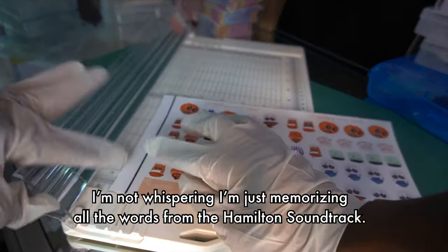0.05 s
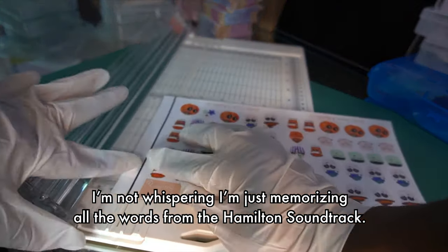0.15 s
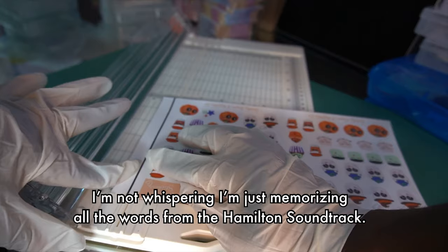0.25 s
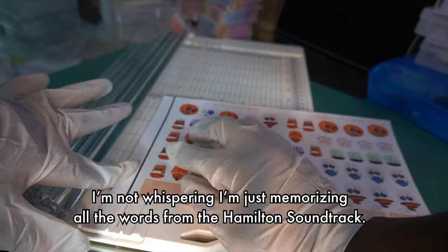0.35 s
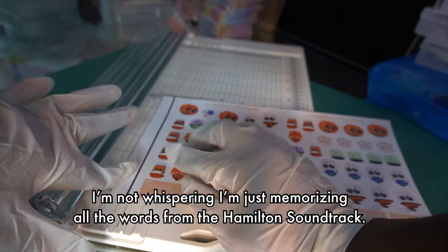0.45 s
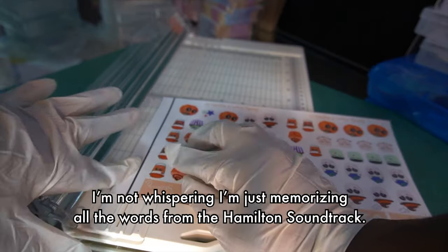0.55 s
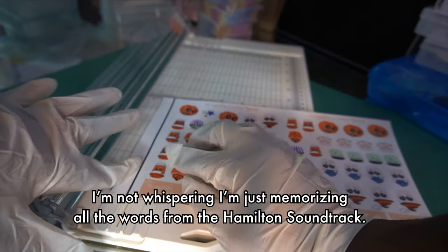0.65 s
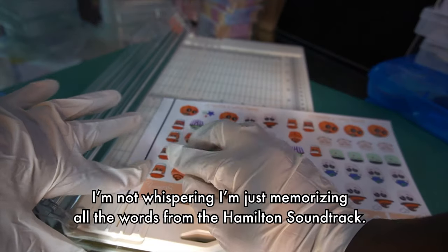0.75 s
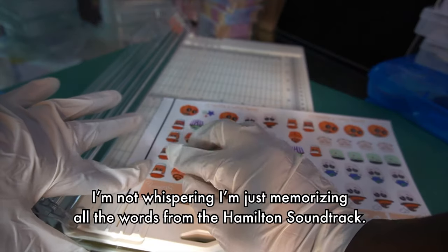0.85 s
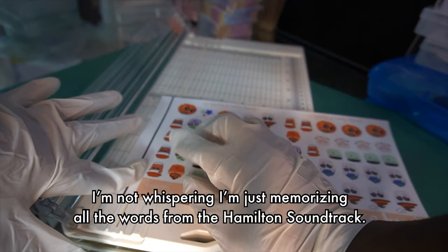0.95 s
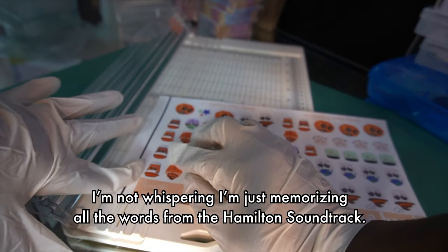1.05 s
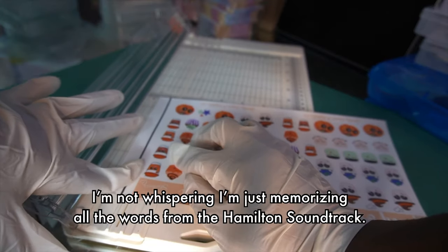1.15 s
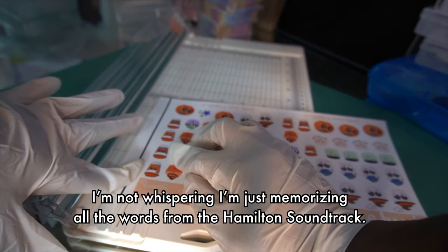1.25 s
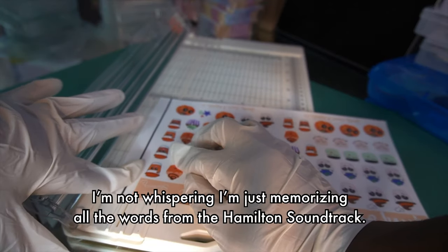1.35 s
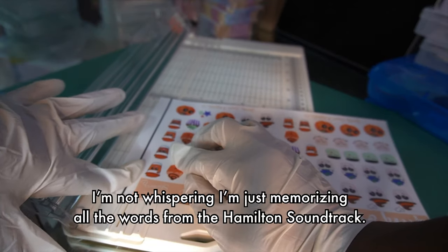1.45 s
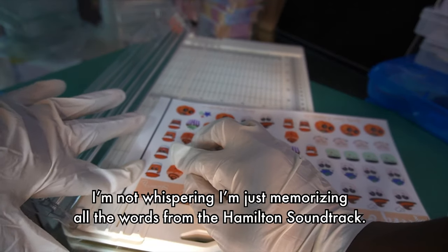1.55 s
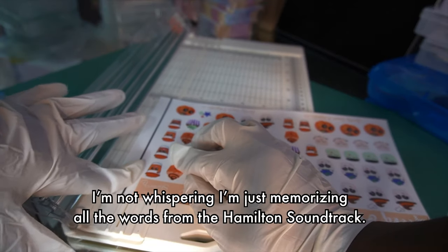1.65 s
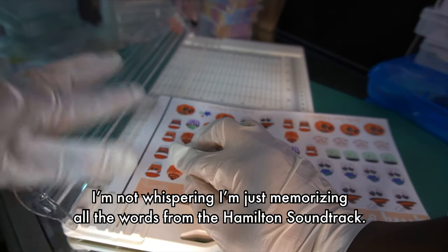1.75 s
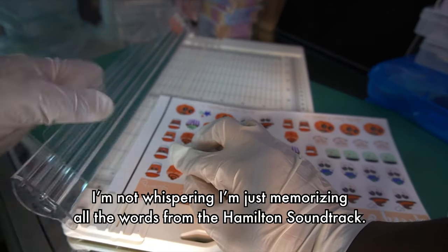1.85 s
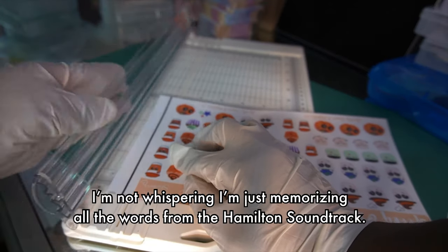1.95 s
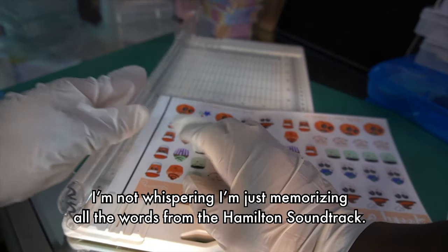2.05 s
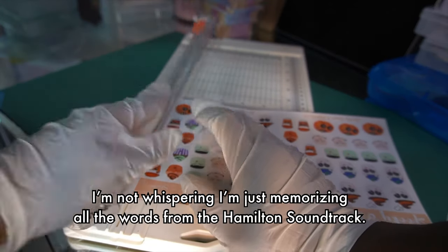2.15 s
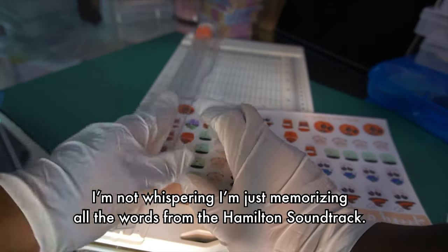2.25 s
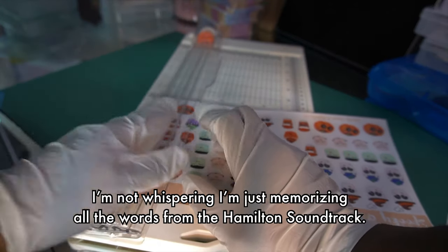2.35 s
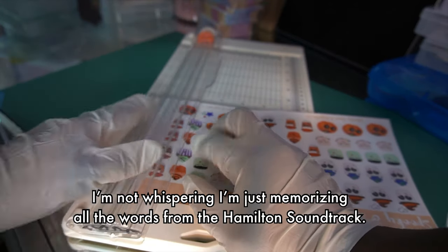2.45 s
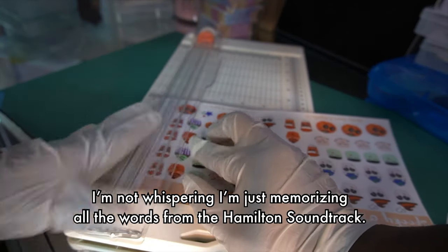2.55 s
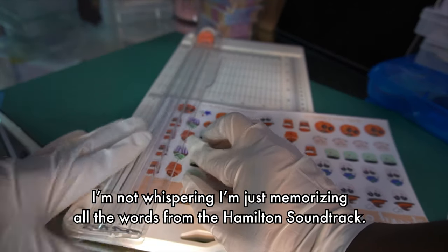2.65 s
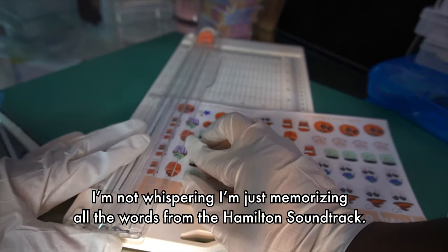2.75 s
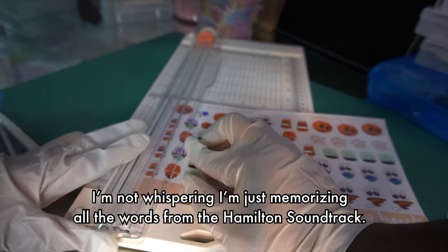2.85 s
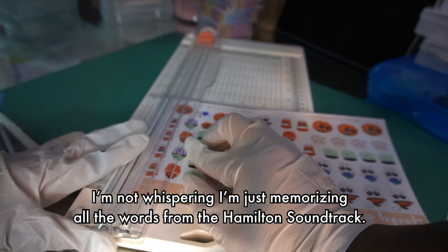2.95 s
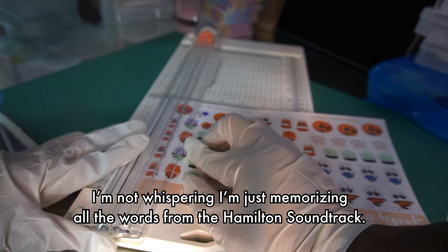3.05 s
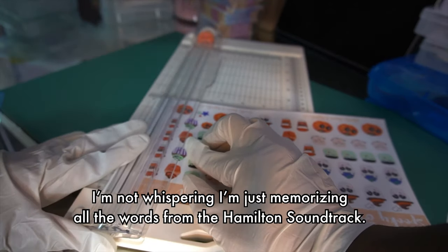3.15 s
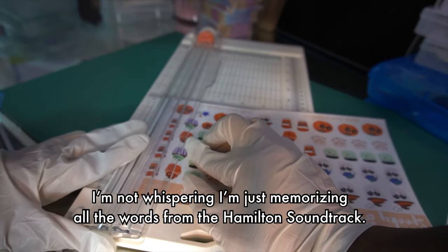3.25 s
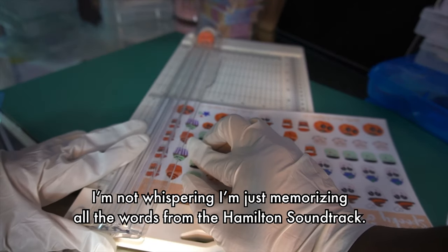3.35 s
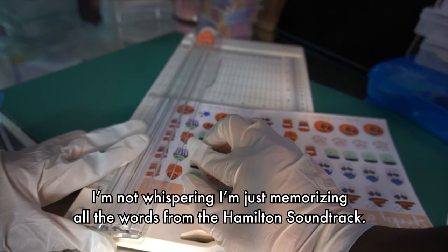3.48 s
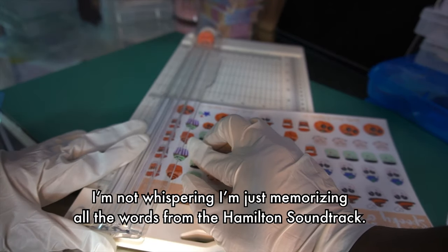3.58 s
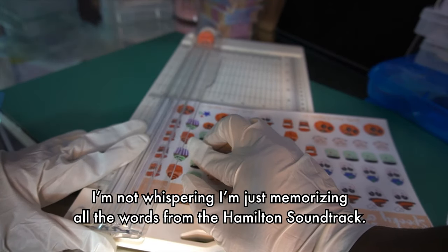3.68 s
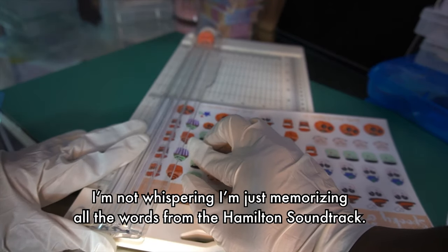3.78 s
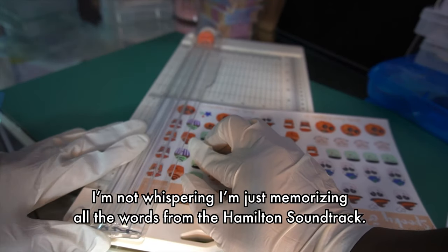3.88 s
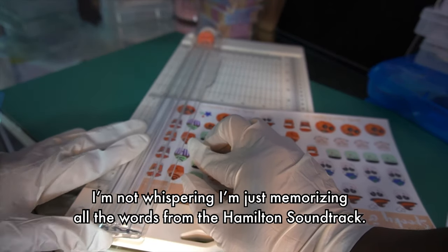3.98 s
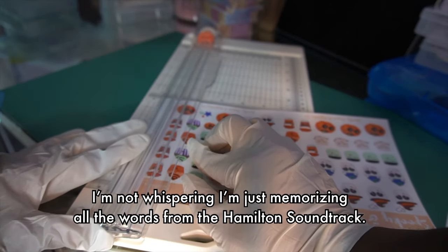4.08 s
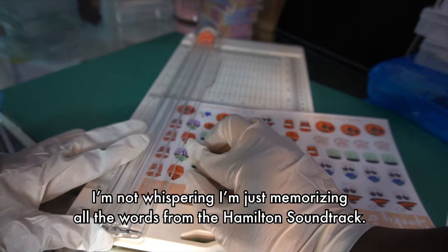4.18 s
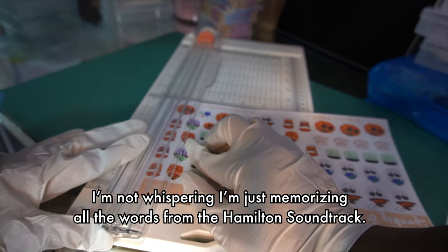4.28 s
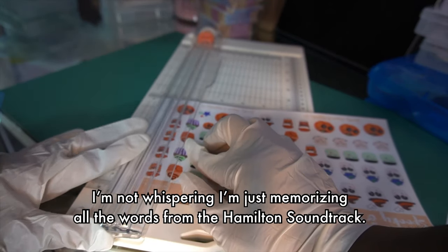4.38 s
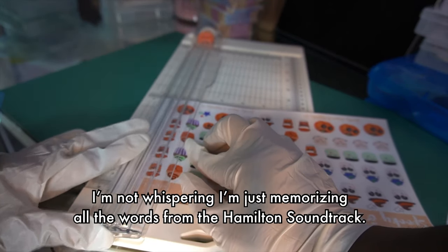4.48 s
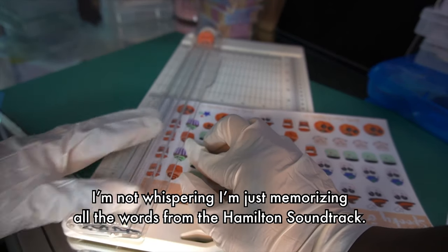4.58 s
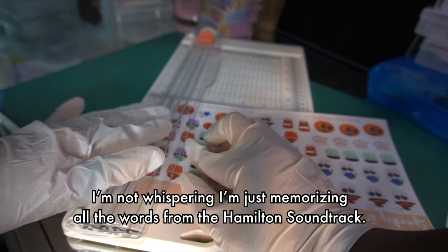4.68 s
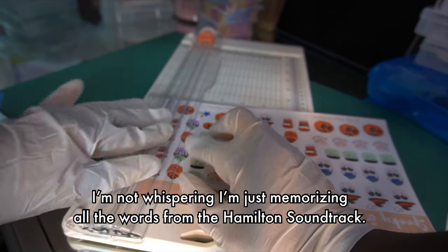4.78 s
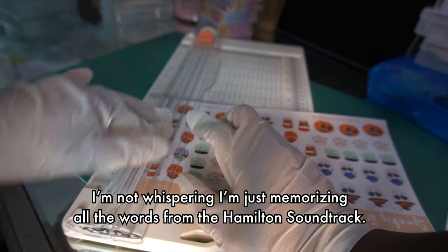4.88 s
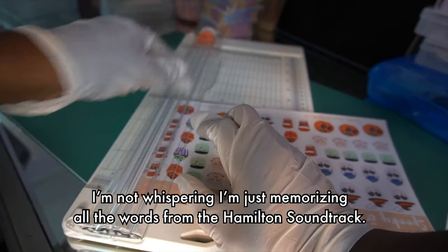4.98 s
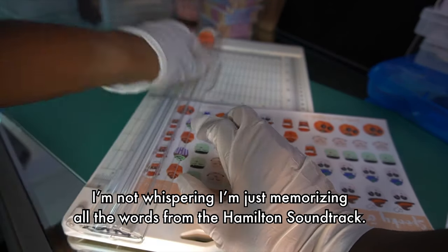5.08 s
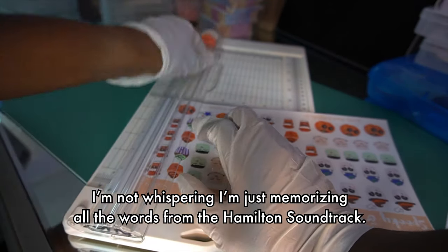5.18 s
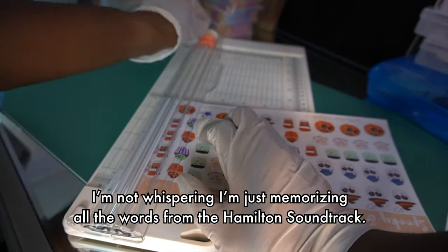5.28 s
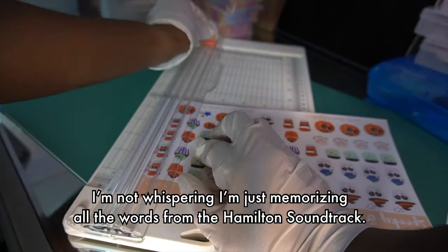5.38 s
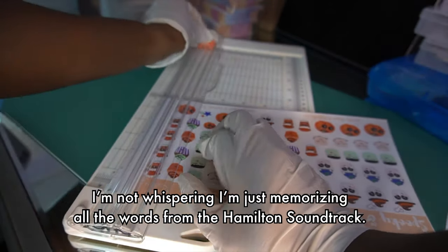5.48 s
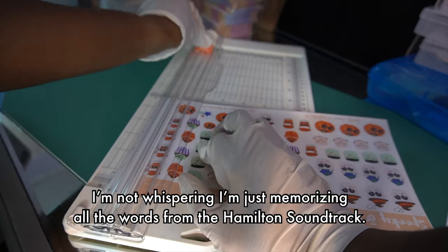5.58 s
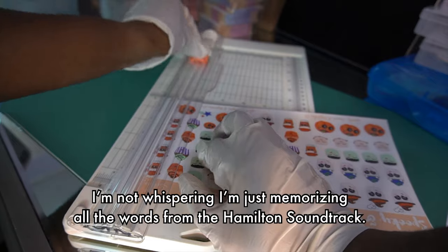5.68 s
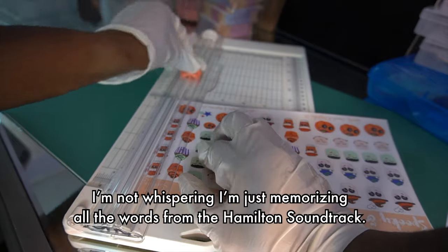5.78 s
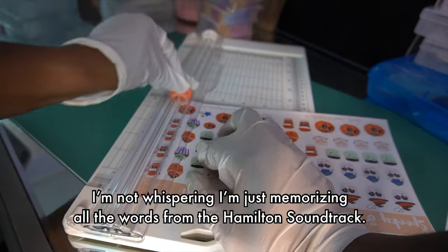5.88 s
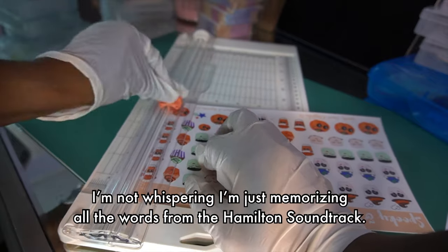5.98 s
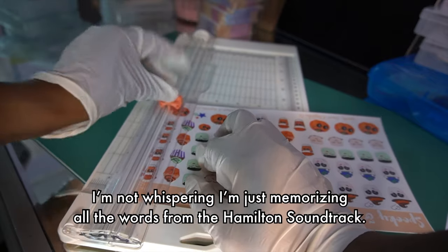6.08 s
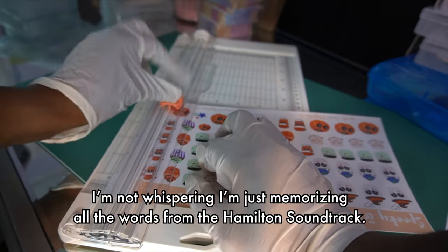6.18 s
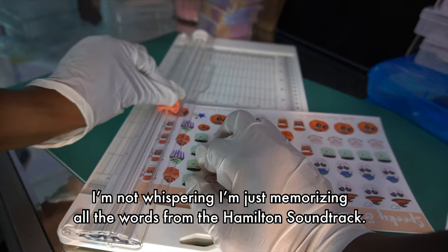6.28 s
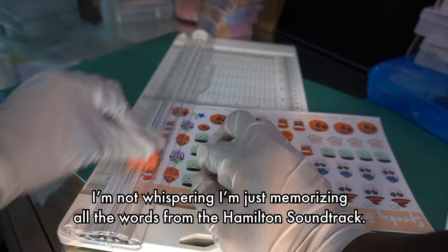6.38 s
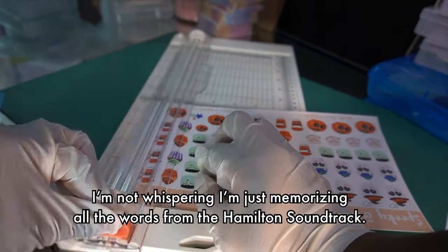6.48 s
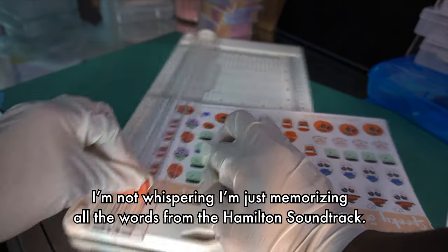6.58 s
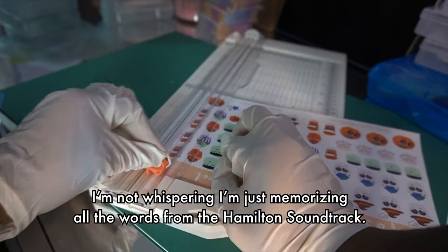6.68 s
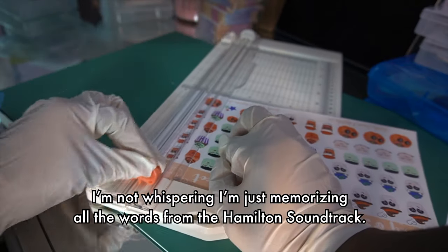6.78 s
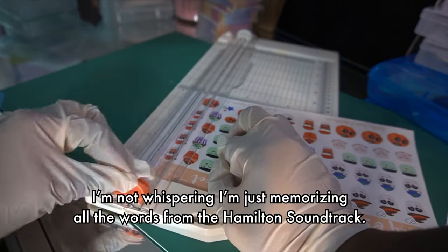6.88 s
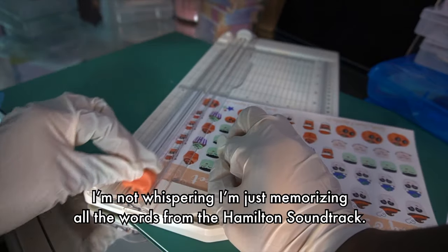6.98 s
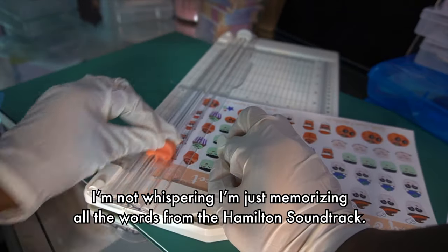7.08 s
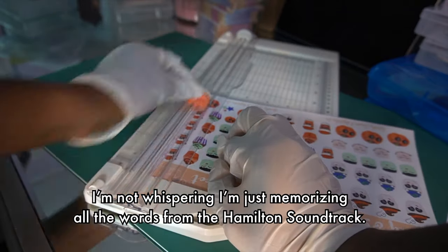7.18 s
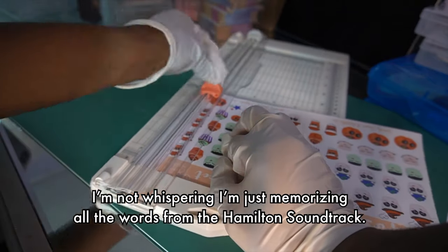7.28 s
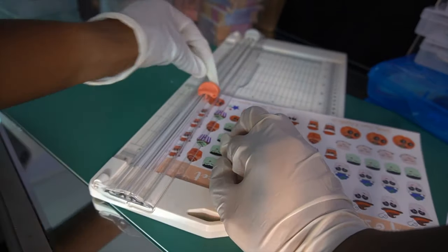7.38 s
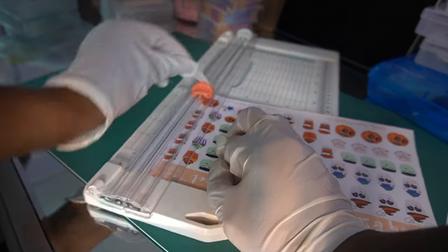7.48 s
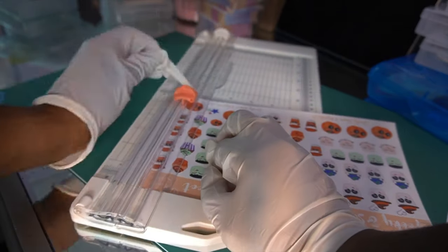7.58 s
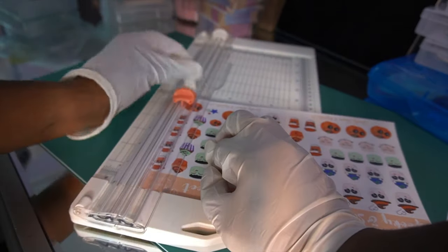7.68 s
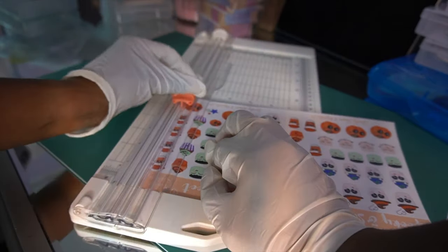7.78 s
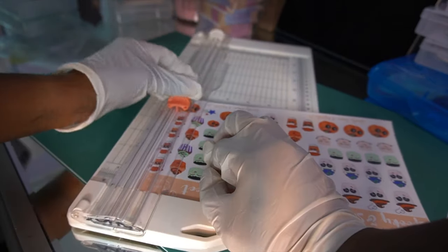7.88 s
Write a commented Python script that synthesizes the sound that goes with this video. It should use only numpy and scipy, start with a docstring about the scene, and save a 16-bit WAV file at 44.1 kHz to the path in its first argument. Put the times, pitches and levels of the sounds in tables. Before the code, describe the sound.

Gloved hands line up a sheet on a plastic paper trimmer with faint rustles and ticks. The guide rail clatters shut, and the soft handling goes on. Then the blade carriage is nudged along with clicks and little scrapes, drawn through the paper in two quick pulls, and knocks on its stop. It slides back and knocks again. Each blow rings the hollow base and thumps the desk, close up in a quiet room.

```python
"""A plastic paper trimmer on a desk, close up in a quiet room. A sheet slides to rest; gloved hands line it
up with rustles and ticks. At 2.3 s the guide rail clatters shut. From 5 s the blade carriage is nudged
along, scraping in fine slips; one small squeak at 5.9 s. At 6.2 s two pulls draw the carriage through
the paper; at 6.7 s it bounces on its stop. It is pushed back and hits a stop again at 7.3 s.
Every blow rings the hollow base and thumps the desk."""
import sys
import numpy as np
from scipy import signal
from scipy.fft import rfft, irfft, next_fast_len
from scipy.io import wavfile
from scipy.ndimage import uniform_filter1d, map_coordinates

SR = 44100
rng = np.random.default_rng(int(sys.argv[2]) if len(sys.argv) > 2 else 0)


def bounce(signal):
    """Save signal as a 16-bit WAV file at the path given by the first command-line argument."""
    frames = np.transpose(np.atleast_2d(signal))
    limited = np.clip(frames, -1, 1)
    pcm = np.round(limited * 32767).astype(np.int16)
    wavfile.write(sys.argv[1], SR, pcm)


N = 349707

# hard clacks of plastic on plastic, and clicks of the blade: t/s, knock/dB, snap/dB, thump/dB, knock centre/Hz,
# snap edge/dB
HARD_CLACKS = [(4.99, -52, -36.5, -54, 1390, -2.5), (5.112, -28.5, -24.5, -54, 1130, 6),
               (5.1159, -16, -25, -31, 1860, 10), (5.1193, -47, -21, -61, 2080, 3),
               (5.364, -15, -35, -52, 1360, 1), (5.371, -22.5, -20, -32, 1470, 8.5),
               (5.4814, -34, -28.5, -58, 1750, 2), (5.488, -22.5, -25.5, -56, 1350, 2.5),
               (5.931, -41, -28, -34.5, 1430, 5), (6.208, -36, -33.5, -46, 1260, -2),
               (6.4759, -20.5, -19, -41, 1660, 7), (6.4957, -16, -19.5, -42, 1930, 1),
               (6.866, -25, -17.5, -36, 2110, 4.5), (7.184, -34.5, -35.5, -43, 1390, -3),
               (7.22, -38, -29, -28.5, 1480, -6), (7.322, -32, -34, -35, 1020, 22),
               (7.337, -24.5, -23, -25, 1400, 2), (7.354, -23.5, -41, -50, 1290, -3),
               (7.865, -43, -45, -50, 1390, -12)]
# gloved finger taps: t/s, knock/dB, thump/dB, knock centre/Hz
FINGER_TAPS = [(1.91, -43, -56, 740), (1.941, -37, -58, 973), (2.061, -43.5, -54, 1970),
               (2.496, -53, -45, 730), (2.763, -39, -57, 1900), (4.675, -39.5, -37, 1030),
               (4.79, -35.5, -39, 710), (4.817, -36, -47, 930), (4.972, -42.5, -49, 1000),
               (5.255, -33.5, -49, 1150), (5.4379, -32, -39, 1110), (5.455, -29.5, -43, 1090),
               (5.5753, -24, -40, 1170), (5.675, -37.5, -54, 1710), (5.786, -42, -48, 990),
               (6.149, -35.5, -53, 1640), (6.583, -22.5, -37, 1010), (6.796, -38.5, -61, 1450),
               (6.969, -42, -52, 1750), (7.003, -41.5, -52, 1060), (7.074, -39, -47.5, 1160),
               (7.691, -45, -42.5, 780), (7.752, -38.5, -44, 1550)]
# carriage on an end stop: t/s, knock/dB, thump/dB, bounce gap/s, loss per bounce/dB
STOP_HITS = [(6.682, -14, -25, 0.0062, 6.5), (7.263, -12.5, -23.5, 0.0083, 5.5)]
# brief sliding rubs; a sheet sliding to rest at the start, later the carriage nudges:
# full speed t/s, rise/s, hold/s, fade/(dB/s), rail/dB, then base, hiss, desk/dB re rail
SHORT_SLIDES = [(0.0, 0.005, 0.0026, 407, -39, -8, -4.5, -14),
                (2.24, 0.007, 0.008, 280, -54.5, 0.5, -12, -14),
                (2.326, 0.0093, 0.047, 366, -27.5, 2.5, -1, -4.5),
                (5.132, 0.022, 0.021, 184, -34, -2, -1, -3.5),
                (5.372, 0.008, 0.003, 285, -37.5, 4.5, -3, 4.5),
                (5.495, 0.02, 0.002, 394, -35, 2.5, -4, 0.5), (5.934, 0.011, 0.02, 309, -37, 5.5, 0.5, 1.5),
                (6.68, 0.015, 0.003, 390, -35, -4, -11, 2), (6.841, 0.022, 0.004, 400, -45, 0, 2.5, 2),
                (6.88, 0.0067, 0.006, 208, -44.5, -4.5, 1, 1.5),
                (7.219, 0.075, 0.055, 298.5, -39.5, 3.5, 2, 3),
                (7.331, 0.011, 0.0052, 309, -35, 4.5, -1.5, 3), (7.541, 0.067, 0.07, 385, -44.5, 6, -8, 3),
                (7.925, 0.08, 0.01, 280, -51, 8, -1.5, 8)]
# the cut, one list per pull: t/s, rail/dB, then base, hiss/dB re rail
CUT_PULLS = [
    [(6.235, -57, 11.5, -8), (6.281, -51.5, -3, 1.5), (6.319, -33, -3, 1), (6.393, -33, -0.5, 5.5),
     (6.431, -25, -9, -0.5), (6.468, -30.5, -8, -0.5)],
    [(6.512, -35, 1, -17), (6.548, -47.5, 2, -5), (6.596, -39.5, 4, -6), (6.642, -20.5, -9, -6.5),
     (6.675, -29.5, 3, -4)],
]
# top of the hiss, keenest on the bare far end of the rail: t/s, level/dB
HISS_TOP = [(2.4, 1.5), (5.1, 3), (6.0, 0.5), (6.35, 0.5), (6.7, -0.5), (7.3, 1.5)]
# gloves shifting on paper: t/s, hold/s, level/dB
HAND_MOVES = [(0.096, 0.13, -60), (0.306, 0.097, -63.5), (0.533, 0.02, -65), (0.708, 0.01, -57.5),
              (0.934, 0.076, -60), (1.75, 0.34, -60.5), (2.178, 0.037, -56), (2.457, 0.015, -51.5),
              (2.532, 0.15, -57), (2.794, 0.015, -55), (3.848, 0.02, -58.5), (4.507, 0.16, -59.5),
              (4.794, 0.012, -54.5), (4.962, 0.1, -55), (5.342, 0.022, -52.5), (5.59, 0.4, -55.5),
              (6.094, 0.044, -48), (6.205, 0.04, -52.5), (7.067, 0.083, -48), (7.455, 0.021, -51),
              (7.677, 0.005, -51.5), (7.73, 0.058, -52.5)]
# pitched ticks from handling the sheet, one small squeak at 5.9 s: t/s, f/Hz, level/dB
GLOVE_TICKS = [(0.121, 5760, -50), (0.229, 4230, -51), (0.379, 5740, -52), (0.519, 4350, -55),
               (0.704, 4470, -52), (1.018, 6020, -50.5), (1.784, 7100, -56), (2.033, 6400, -50),
               (2.06, 3940, -44.5), (2.542, 1790, -51), (2.639, 1860, -49), (2.726, 1570, -48),
               (3.857, 5740, -50), (4.212, 2400, -51.5), (4.565, 5970, -52), (4.953, 5930, -52),
               (5.911, 3730, -43.5), (6.108, 5500, -43), (7.863, 6020, -45)]

# resonances: f/Hz, width/Hz, level/dB
BASE_MODES = [(366, 47, 1.5), (464, 26, -0.5), (582, 52, -6), (754, 170, -2.5), (896, 52, 3),
              (1074, 34, 1.5), (1287, 19.4, 0.5), (1615, 152, 3), (1913, 28, 0.5), (2454, 17, -11),
              (2850, 21, -3), (3450, 74, -8.5)]
CARRIAGE_MODES = [(4680, 1900, 6.5), (6970, 1000, -1), (8580, 590, 1.5), (12200, 1160, -2)]
RAIL_MODES = [(1830, 150, -5)]
DRONE_MODES = [(90, 3.1, 2), (139, 17, -10), (184.5, 22, -11.5), (249, 15.3, -13)]
# desk resonances: f/Hz, level/dB, t60/s
DESK_MODES = [(113.8, -8.5, 0.17), (187.2, 2.5, 0.15), (230.4, 0, 0.28)]

# spectra of blows, scrape, gloves and room noise: f/Hz, level/dB
KNOCK_EQ = [(150, -25.5), (400, 8.5), (900, -1), (1700, -5), (3200, 3), (4500, 2), (9000, -14),
            (16000, -41)]
SNAP_EQ = [(1200, -21), (3000, -10), (5000, -1), (7000, 2), (9000, -6), (12000, -7.5), (16000, -11.5)]
RAIL_EQ = [(700, -38.5), (1250, -6), (1700, 0), (2300, 1), (3400, 0), (4500, -9), (7000, -40.5)]
BASE_EQ = [(300, -50.5), (500, 5), (750, 5.5), (1000, 4.5), (1250, 5.5), (1800, -10.5), (4000, -60.5)]
HISS_EQ = [(2000, -30), (3800, -4), (5500, 6.5), (7800, 5.5), (10500, 2), (13500, -0.5), (16000, -2)]
RUMBLE_EQ = [(70, -24.5), (140, -12.5), (190, -7.5), (240, 2), (300, -18), (390, -1.5), (520, -20.5),
             (800, -23), (2000, -57)]
BRUSH_EQ = [(300, 11), (1000, 8), (2500, 2.5), (5500, -2), (8000, -11), (12000, -2.5), (16000, -5.5)]
CRINKLE_EQ = [(2500, -20), (4500, -0.5), (6500, 0), (9000, -4), (13000, -12.5), (16000, -33)]
AIR_EQ = [(15, -43), (25, -27), (59, -16), (74, -30), (94, 5.5), (120, -17), (157, -1), (205, -10),
          (241, -4), (307, -13.5), (437, -11), (955, -18), (1120, -17.5), (1510, -23), (15800, -32)]
# stereo side gain of trimmer and room noise: f/Hz, level/dB
TRIMMER_SIDE = [(100, -74), (400, -83), (800, -41), (1300, -17), (2400, -8.5), (4400, -6), (8000, -4),
                (15000, -5)]
AIR_SIDE = [(60, -29.5), (300, -6.5), (1200, 3.5), (4000, 2), (12000, -1)]
# room decay: f/Hz, t60/s
ROOM_T60 = [(200, 0.47), (1500, 0.24), (6000, 0.12), (15000, 0.026)]

SHUT_S, CHATTER_GAP_S, CHATTER_HOLD_S, SETTLE_DB_PER_S = 2.3194, 0.0178, 0.053, 370
RUN_UP_DB, COAST_DB_PER_S = 19, 300
HAND_RISE_S, HAND_FADE_DB_PER_S = 0.044, 126
TOP_HZ = 16000


def contacts(knock_t60_s=0.015, snap_t60_s=0.017, knock_tail_db=-31, snap_tail_db=-27):
    """Plastic chatters briefly at each contact: base knock, bright snap, desk thump."""
    out, t = np.zeros((2, N)), np.arange(SR // 5) / SR
    tail = amp(-60 * t / .13)

    def burst(t60_s, tail_db):
        return rng.standard_normal((2, len(t))) * (amp(-60 * t / t60_s) + amp(tail_db) * tail)

    def equal_energy(x):
        return x / np.linalg.norm(x, axis=1, keepdims=True) * np.sqrt(.003 * SR)

    blows = rail_chatter() + stop_bounces() + HARD_CLACKS + finger_taps()
    for s, knock_db, snap_db, thump_db, centre_hz, edge_db in blows:
        # the glove cushions light touches: slower onset
        rise_s = np.interp(max(knock_db, snap_db), [-45, -30], [.013, .00012])
        onset = 1 - np.exp(-t / rise_s)
        knock = colour(onset * burst(knock_t60_s, knock_tail_db), knock_spectrum(centre_hz))
        knock = equal_energy(ringing(knock, base_at_contact(), direct=0.18))
        snap = colour(onset * burst(snap_t60_s, snap_tail_db), snap_spectrum(edge_db))
        snap = equal_energy(ringing(snap, CARRIAGE_MODES, direct=2.1))
        add(out, s, amp(knock_db) * knock + amp(snap_db) * snap + amp(thump_db) * desk_thump(t))
    return out


def rail_chatter(count=7, knock_db=-20, snap_db=-23, thump_db=-31, thump_slope_db_per_s=300,
                 centre_hz=1400, edge_db=3):
    """The rail chatters on the base; its weight reaches the desk as it starts to settle."""
    offsets_s = CHATTER_GAP_S * np.arange(count) - CHATTER_HOLD_S
    losses_db = SETTLE_DB_PER_S * np.maximum(offsets_s, 0)
    return [(SHUT_S + CHATTER_HOLD_S + s, knock_db - loss_db, snap_db - loss_db,
             thump_db - thump_slope_db_per_s * abs(s), centre_hz, edge_db)
            for s, loss_db in zip(offsets_s, losses_db)]


def stop_bounces(count=4, first_hz=1350, bounce_hz=950, snap_db=-9, duller_db=4,
                 thump_loss_db=5, edge_db=-4):
    """The carriage hits its stop hard, then bounces, weaker and duller."""
    return [(s + k * gap_s, db - k * loss_db, db + snap_db - k * (loss_db + duller_db),
             thump_db - k * thump_loss_db, bounce_hz if k else first_hz, edge_db)
            for s, db, thump_db, gap_s, loss_db in STOP_HITS for k in range(count)]


def finger_taps(snap_db=-54, snap_growth=0.33, typical_db=-38, edge_db=-5):
    """The glove takes nearly all the snap out of a tap."""
    return [(s, db, snap_db + snap_growth * (db - typical_db), thump_db, hz, edge_db)
            for s, db, thump_db, hz in FINGER_TAPS]


def knock_spectrum(centre_hz, octave_loss_db=5.5):
    """Soft contacts favour low modes, hard ones high."""
    return [(hz, db - octave_loss_db * min(np.log2(hz / centre_hz) ** 2, 4)) for hz, db in KNOCK_EQ]


def snap_spectrum(edge_db):
    """A sharp edge lifts the top treble."""
    return [(hz, db + edge_db * np.clip(np.log2(hz / 6500), -.5, 1)) for hz, db in SNAP_EQ]


def base_at_contact():
    """Each contact point excites and loads the base modes differently."""
    shifts = rng.standard_normal((len(BASE_MODES), 2)) * [.018, 3]
    return [(hz * (1 + detune), width_hz, db + extra_db)
            for (hz, width_hz, db), (detune, extra_db) in zip(BASE_MODES, shifts)]


def desk_thump(t, rise_s=0.0035):
    """The desk booms; the weight of the hands shifts its modes from blow to blow."""
    shifts = rng.standard_normal((len(DESK_MODES), 2)) * [.02, 2]
    ring = sum(amp(db + extra_db - 60 * t / t60_s) * np.sin(2 * np.pi * hz * (1 + detune) * t)
               for (hz, db, t60_s), (detune, extra_db) in zip(DESK_MODES, shifts))
    return ring * (1 - np.exp(-t / rise_s))


def sliding_scrape(base_db=-2, rumble_db=-3):
    """Carriage or sheet slips finely: the rail sings, paper hisses, the base drums and shakes the desk."""
    rail_gain, base_gain, hiss_gain, desk_gain = slide_gains()
    friction = grains(rate_hz=3200, spread_db=4, smooth=1)
    friction = patchy(friction, depth_db=2.6, width_hz=450, length_s=.022)
    rail = rail_gain * unit(ringing(colour(friction, RAIL_EQ), BASE_MODES + RAIL_MODES, direct=1.0))
    base = base_gain * unit(ringing(colour(friction, BASE_EQ), BASE_MODES, direct=0.25))
    hiss = hiss_gain * hiss_treble(unit(ringing(colour(friction, HISS_EQ), CARRIAGE_MODES, direct=2.2)))
    rumble = desk_gain * unit(colour(friction, RUMBLE_EQ, size=4096))
    return rail + amp(base_db) * base + hiss + amp(rumble_db) * rumble


def slide_gains(pull_db=-0.5, pull_base_db=-1, pull_hiss_db=1, pull_desk_db=-4, pull_rise_s=0.035):
    """Rail, base, hiss and desk gains; each slide or pull coasts to rest."""
    gains, t = np.zeros((4, N)), np.arange(N) / SR
    for s, rise_s, hold_s, fade_db_per_s, db, *relative_db in SHORT_SLIDES:
        gains += np.outer(amp(db + np.array([0, *relative_db])), swell(s, rise_s, hold_s, fade_db_per_s))
    for pull in CUT_PULLS:
        times_s, *columns = np.transpose(pull)
        rail_db, base_rel_db, hiss_rel_db = [np.interp(t, times_s, column) for column in columns]
        base_db, hiss_db = rail_db + base_rel_db, rail_db + hiss_rel_db
        levels_db = [rail_db, base_db + pull_base_db, hiss_db + pull_hiss_db, base_db + pull_desk_db]
        motion = swell(times_s[0], pull_rise_s, times_s[-1] - times_s[0], COAST_DB_PER_S)
        gains += amp(pull_db) * amp(levels_db) * motion
    return gains


def hiss_treble(hiss, split_hz=10000):
    """The top of the hiss changes with the carriage's place on the rail."""
    top = filtered(hiss, lambda f: 1 - 1 / (1 + (f / split_hz) ** 8))
    top_db = np.interp(np.arange(N) / SR, *np.transpose(HISS_TOP))
    return hiss + (amp(top_db) - 1) * top


def grains(rate_hz, spread_db, smooth, decay_s=.0003):
    """Tiny random slips of uneven size over even friction noise."""
    slips = (rng.random(N) < rate_hz / SR) * amp(spread_db * rng.uniform(-1, 1, N))
    slips = signal.lfilter([1], [1, -np.exp(-1 / (decay_s * SR))], slips)
    return unit((unit(slips) + smooth) * rng.standard_normal((2, N)))


def patchy(x, depth_db, width_hz, length_s):
    """Narrow friction bands swell and fade as the contact point moves."""
    z = signal.stft(x, nperseg=256)[2]
    band, frame = np.indices(z.shape[1:])
    hz, s = band * SR / 256, frame * 128 / SR
    knots = rng.standard_normal((200, 4000))
    field = map_coordinates(knots, [hz / width_hz, s / length_s], order=1, mode='wrap')
    return signal.istft(z * amp(depth_db * unit(field)), nperseg=256)[1][:, :N]


def glove_rustle(brush_db=-3, crinkle_db=-6, tick_db=-10):
    """Thin gloves brush the sheet; their folds crinkle in narrow chirps and sparse ticks."""
    touch = np.max([amp(db) * swell(s, HAND_RISE_S, hold_s, HAND_FADE_DB_PER_S)
                    for s, hold_s, db in HAND_MOVES], axis=0)
    brush = unit(colour(grains(rate_hz=2700, spread_db=1, smooth=1), BRUSH_EQ))
    chirps = patchy(rng.standard_normal((2, N)), depth_db=4, width_hz=1200, length_s=.006)
    crinkle = unit(colour(chirps, CRINKLE_EQ))
    ticks = unit(colour(grains(rate_hz=70, spread_db=8, smooth=0), CRINKLE_EQ))
    return touch * (amp(brush_db) * brush + amp(crinkle_db) * crinkle + amp(tick_db) * ticks)


def glove_ticks(peak_s=0.0021, fall_per_s=4, roughness=0.193, overtone_db=-11):
    """Brief pitched ticks from handling the sheet; the pitch wavers and sinks."""
    out, t = np.zeros((2, N)), np.arange(SR // 16) / SR
    envelope = t / peak_s * np.exp(1 - t / peak_s)
    for s, hz, db in GLOVE_TICKS:
        jitter = unit(uniform_filter1d(rng.standard_normal((2, len(t))), size=16))
        phase = 2 * np.pi * np.cumsum(hz * (1 - fall_per_s * t + roughness * jitter), axis=1) / SR
        add(out, s, amp(db) * envelope * (np.sin(phase) + amp(overtone_db) * np.sin(2 * phase)))
    return out


def room_reverb(x):
    """Small furnished room: a short tail, shorter in the treble."""
    hz, t, z = signal.stft(rng.standard_normal((2, SR // 2)), SR, nperseg=256)
    tail = signal.istft(z * amp(-60 * t / along(ROOM_T60, hz)[:, None]), SR, nperseg=256)[1]
    tail = np.pad(tail / np.linalg.norm(tail[0]), ((0, 0), (SR // 200, 0)))  # 5 ms pre-delay
    return signal.fftconvolve(x[:1], tail, axes=1)[:, :N]


def room_tone(air_db=-57.5, drone_db=-60):
    """Steady room noise with a low, fuzzy drone."""
    air = unit(colour(rng.standard_normal((2, N)), AIR_EQ, size=8192))
    drone = unit(filtered(rng.standard_normal((2, N)), lambda f: resonances(DRONE_MODES, f)))
    return stereo(amp(air_db) * air + amp(drone_db) * drone, AIR_SIDE)


def swell(s, rise_s, hold_s, fade_db_per_s):
    """Gain of one movement: gathers speed up to s, holds, dies away."""
    t = np.arange(N) / SR - s
    gain = np.zeros(N)
    near = (t > -.3) & (t < hold_s + .4)
    rise_db = RUN_UP_DB * np.minimum(t[near], 0) / max(rise_s, 1e-3)
    fade_db = fade_db_per_s * np.maximum(t[near] - hold_s, 0)
    gain[near] = amp(rise_db - fade_db)
    return gain


def ringing(x, modes, direct, size=4096):
    """Part of a vibration radiates at once; the rest rings in the modes."""
    impulse = irfft(direct + resonances(modes, np.fft.rfftfreq(size, 1 / SR)))
    return signal.oaconvolve(x, impulse[None], axes=1)[:, :x.shape[1]]


def resonances(modes, f):
    """Complex response of (f/Hz, width/Hz, level/dB) modes."""
    return sum(amp(db) * 1j * f * width_hz / (hz * hz - f * f + 1j * f * width_hz)
               for hz, width_hz, db in modes)


def colour(x, points, size=1024):
    """Minimum-phase filter from (f/Hz, level/dB) points."""
    cepstrum = irfft(np.log(amp(along(points, np.fft.rfftfreq(size, 1 / SR)))))
    cepstrum[1:size // 2] *= 2
    cepstrum[size // 2 + 1:] = 0
    impulse = irfft(np.exp(rfft(cepstrum)))
    return signal.oaconvolve(x, impulse[None], axes=1)[:, :x.shape[1]]


def filtered(x, response):
    """Apply a complex frequency response."""
    n = x.shape[-1]
    size = next_fast_len(n + 4096, True)
    return irfft(rfft(x, size) * response(np.fft.rfftfreq(size, 1 / SR)), size)[..., :n]


def stereo(pair, side_points):
    """Mid and side to left and right; the bass is alike in both."""
    side = filtered(pair[1], lambda f: amp(along(side_points, f)))
    return np.array([pair[0] + side, pair[0] - side])


def along(points, hz):
    """Read (f/Hz, value) points on a log axis."""
    f, values = np.transpose(points)
    return np.interp(np.log(hz + 1), np.log(f + 1), values)


def add(track, s, sound):
    """Mix in at s seconds."""
    part = track[..., round(s * SR):][..., :sound.shape[-1]]
    part += sound[..., :part.shape[-1]]


def amp(db):
    """dB to gain."""
    return 10 ** (np.asarray(db) / 20)


def unit(x):
    """Scale to rms 1."""
    return x / np.sqrt(np.mean(x ** 2) + 1e-20)


def scene(reverb_db=-21, lean_db=1, bass_cut_hz=70):
    """Trimmer and hands in the room; their treble leans left."""
    near = contacts() + sliding_scrape() + glove_rustle() + glove_ticks()
    trimmer = stereo(near + amp(reverb_db) * room_reverb(near), TRIMMER_SIDE)
    lean = lambda f: amp(np.outer([1, -1], along([(500, 0), (1500, -.7), (8000, lean_db)], f)))
    bass_cut = lambda f: 1j * f / (bass_cut_hz + 1j * f)  # deep bass rolls off gently below bass_cut_hz
    return filtered(trimmer, lambda f: lean(f) * bass_cut(f)) + room_tone()


def record(dry):
    """Brick-wall low-pass at TOP_HZ."""
    return filtered(dry, lambda hz: hz < TOP_HZ)


dry = scene()
out = record(dry)
bounce(out)
```